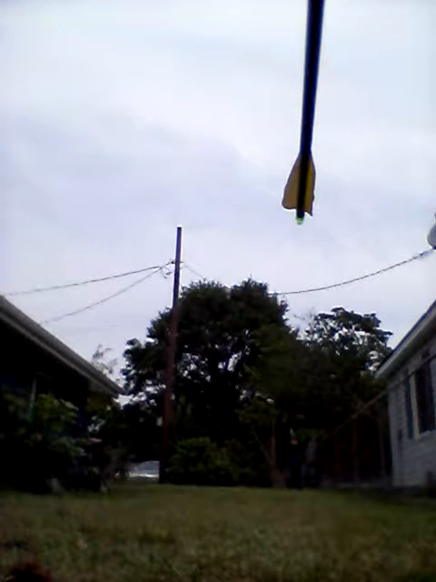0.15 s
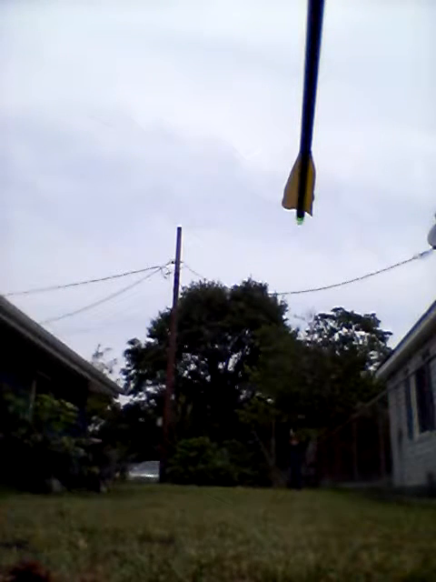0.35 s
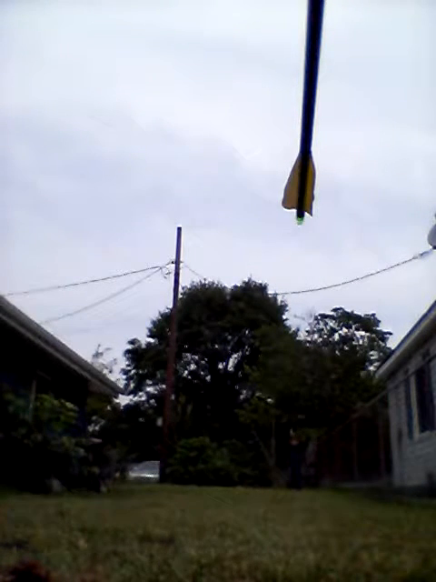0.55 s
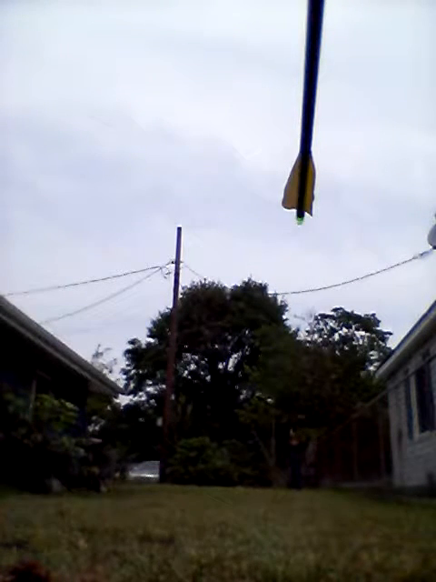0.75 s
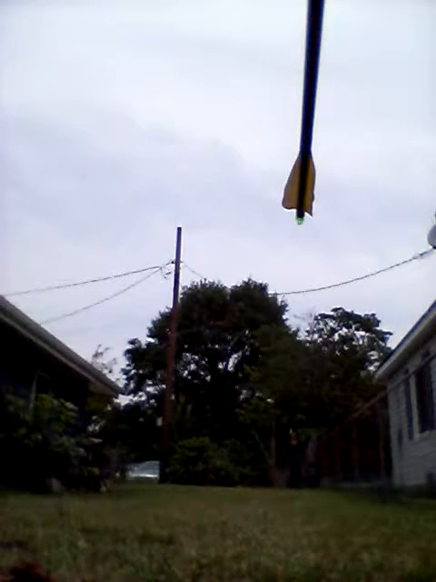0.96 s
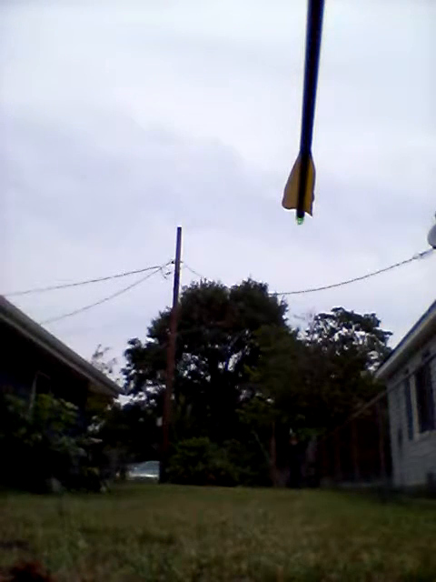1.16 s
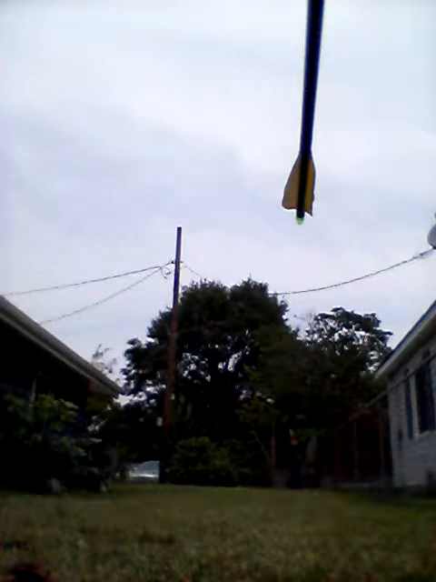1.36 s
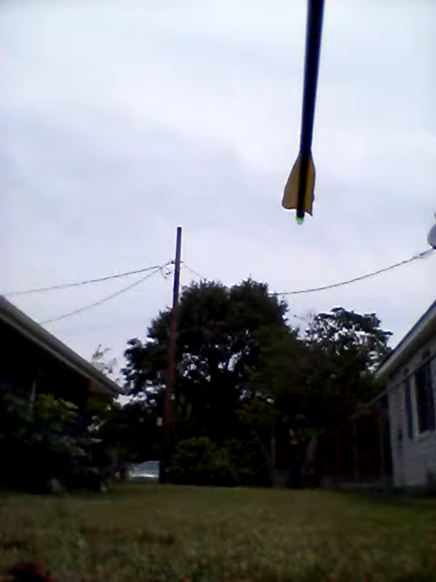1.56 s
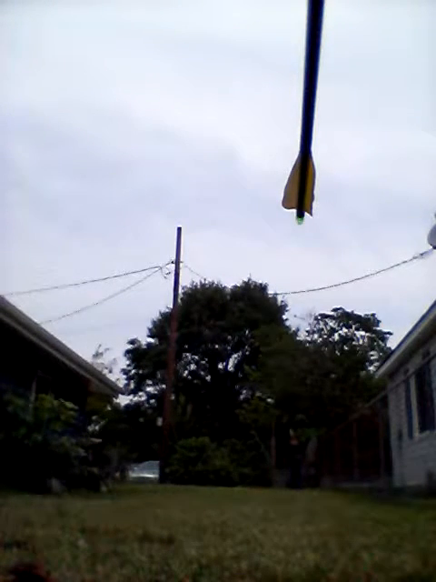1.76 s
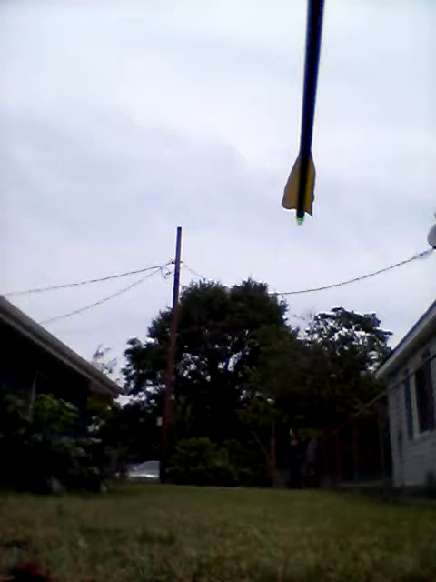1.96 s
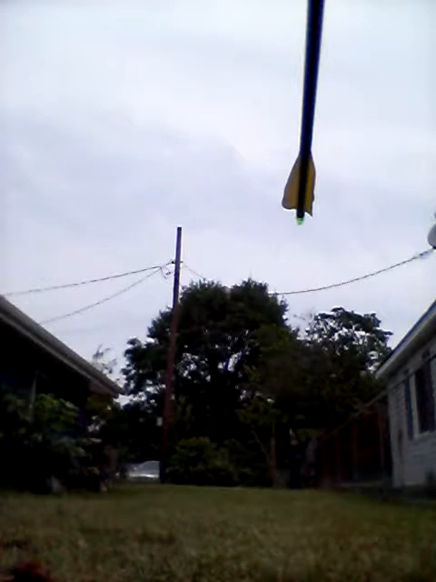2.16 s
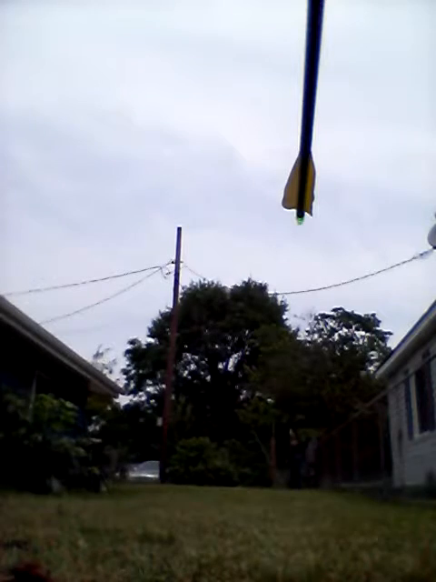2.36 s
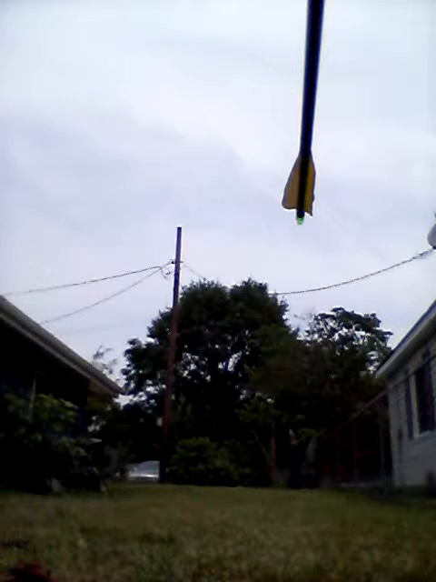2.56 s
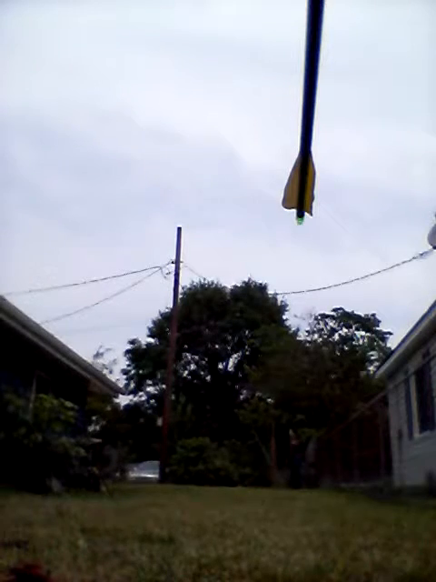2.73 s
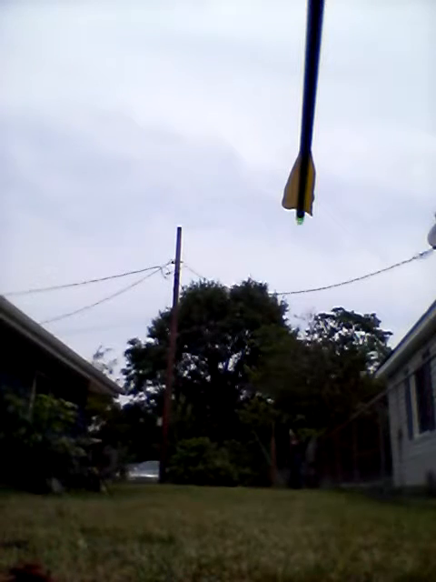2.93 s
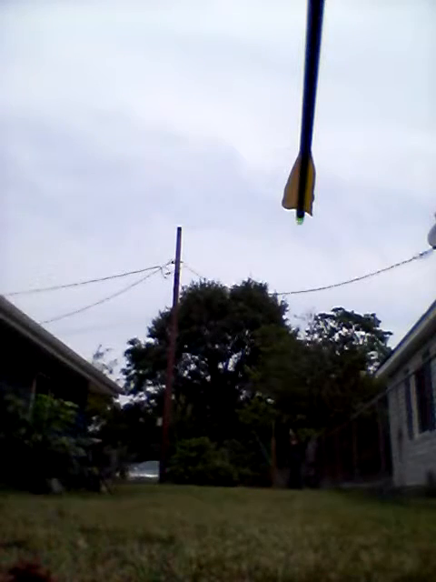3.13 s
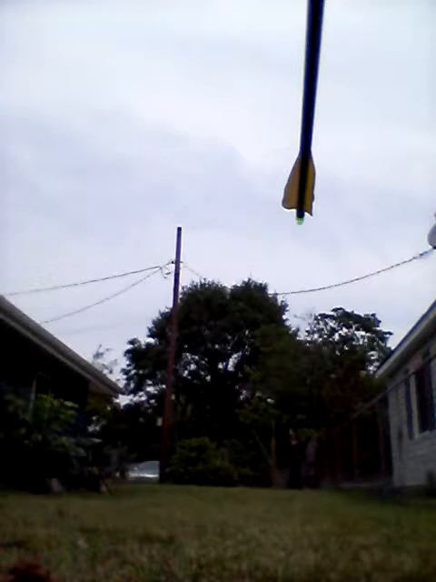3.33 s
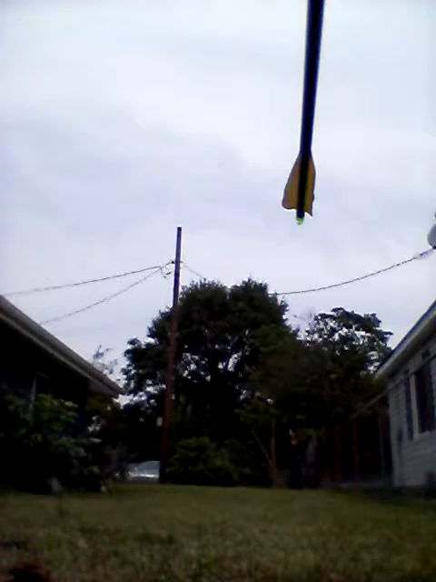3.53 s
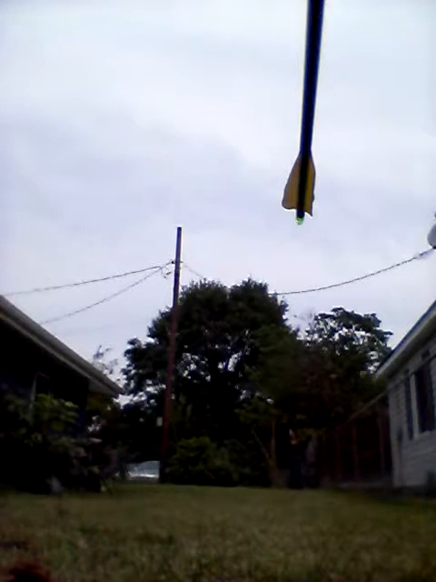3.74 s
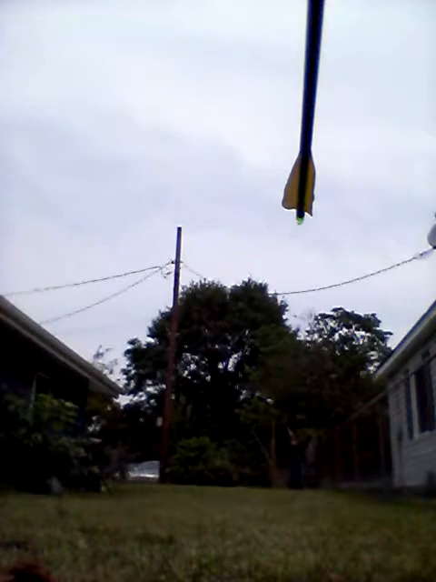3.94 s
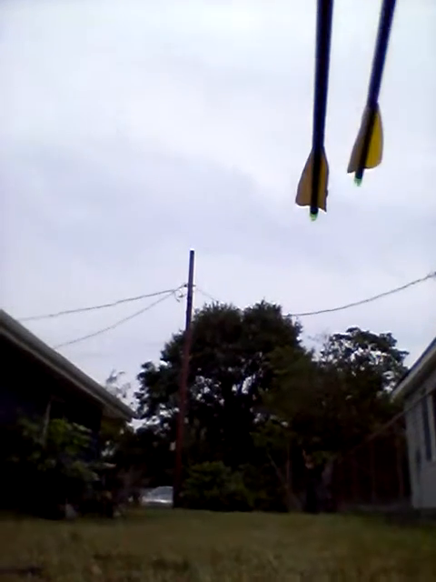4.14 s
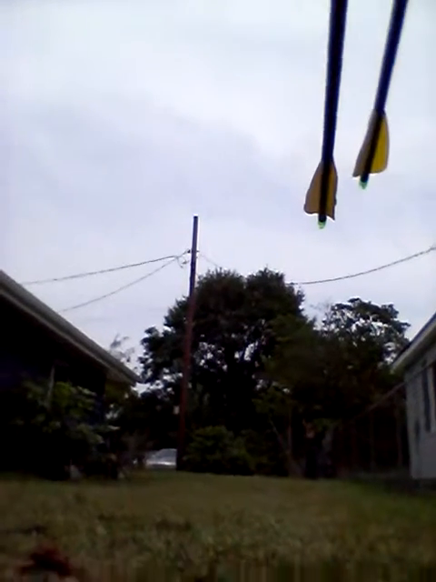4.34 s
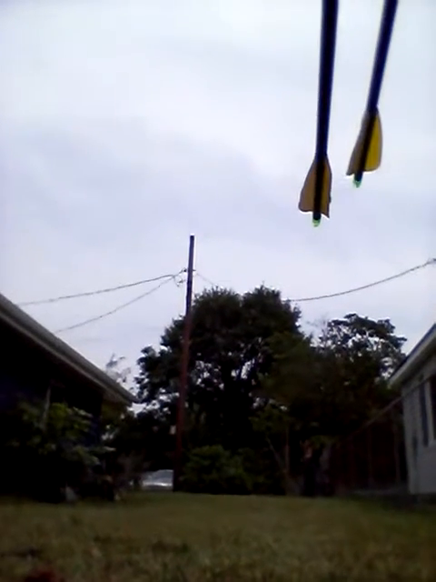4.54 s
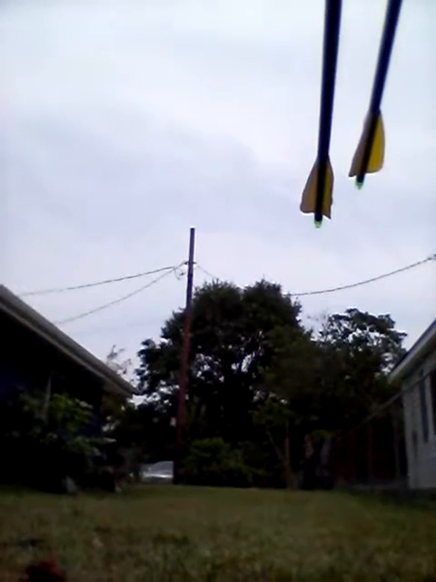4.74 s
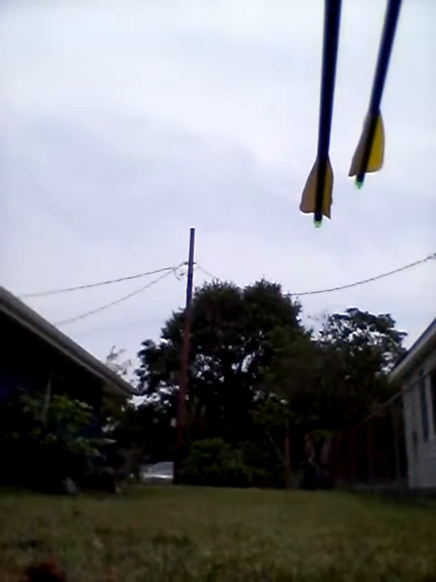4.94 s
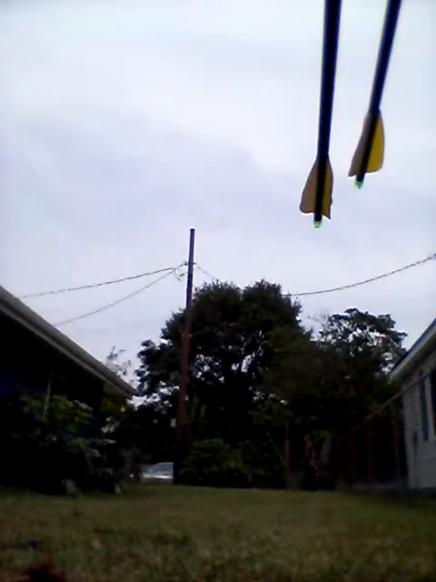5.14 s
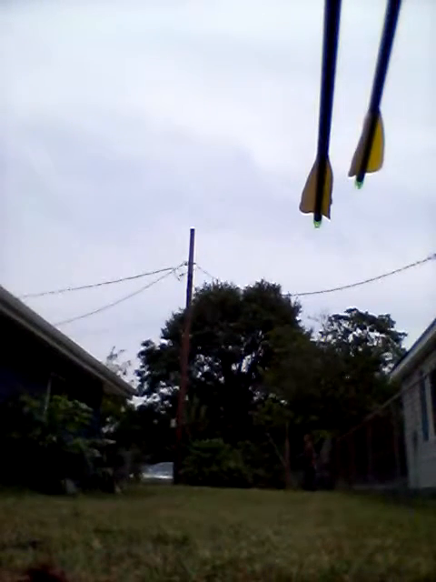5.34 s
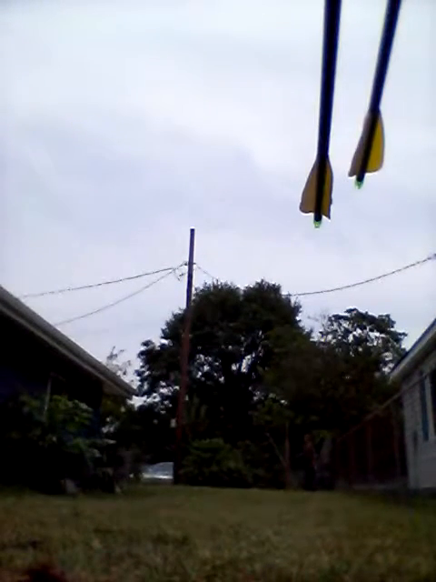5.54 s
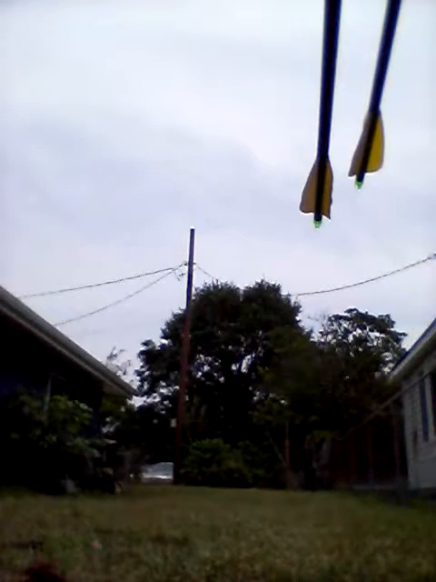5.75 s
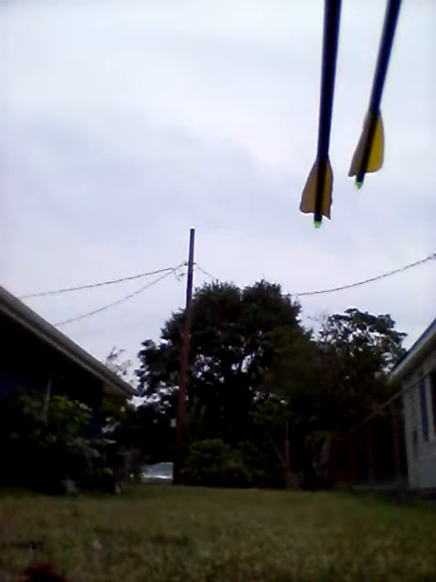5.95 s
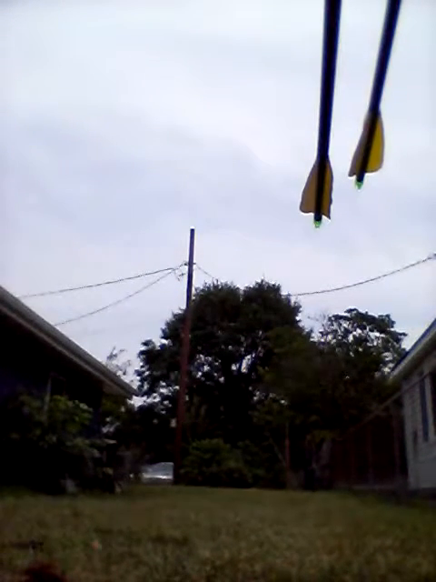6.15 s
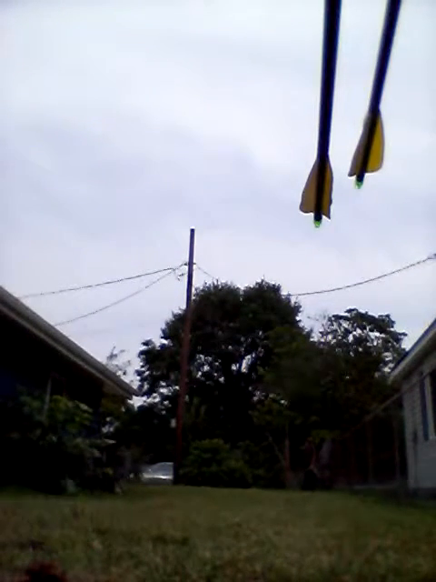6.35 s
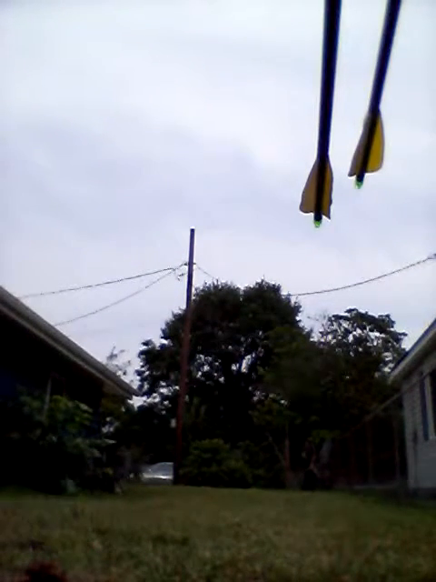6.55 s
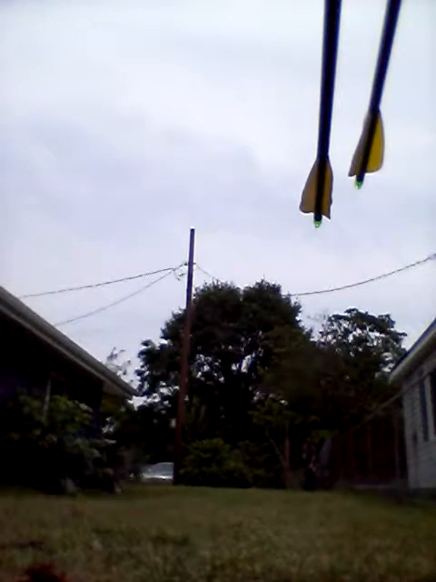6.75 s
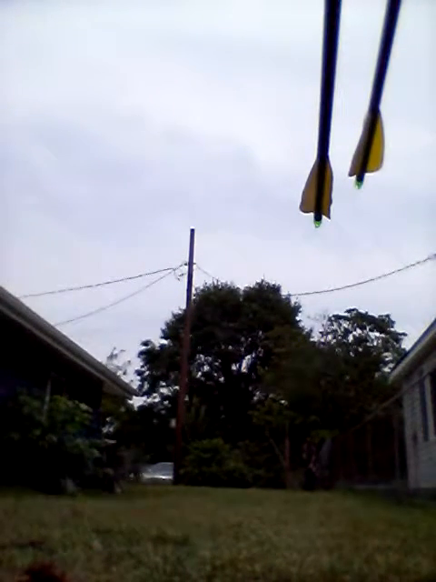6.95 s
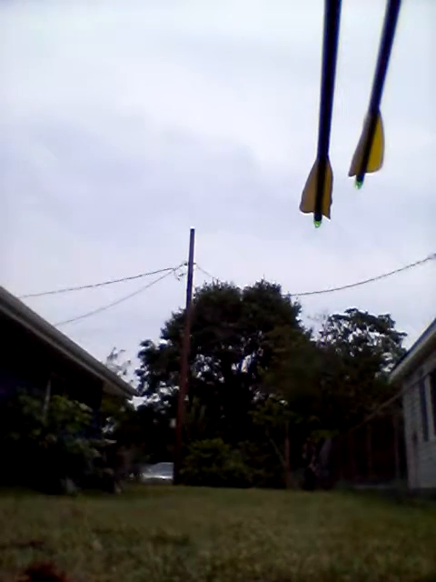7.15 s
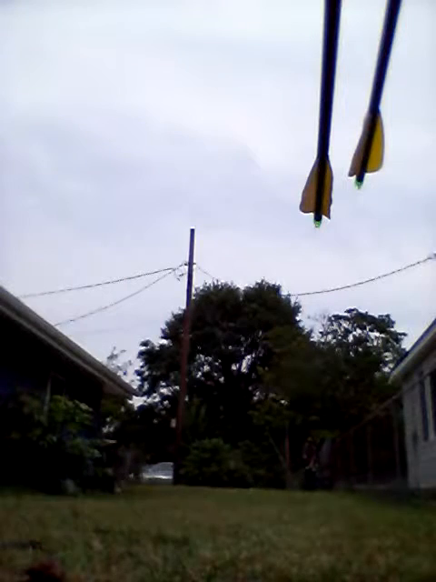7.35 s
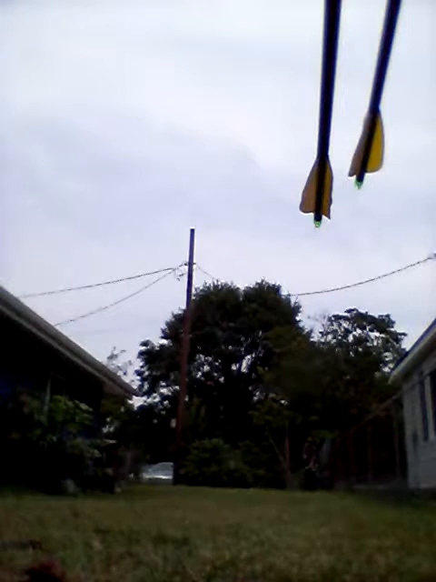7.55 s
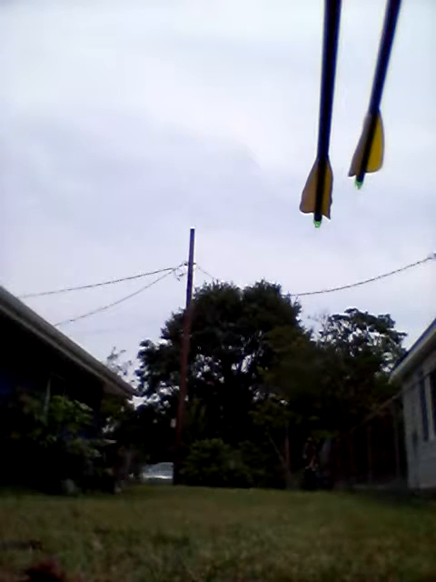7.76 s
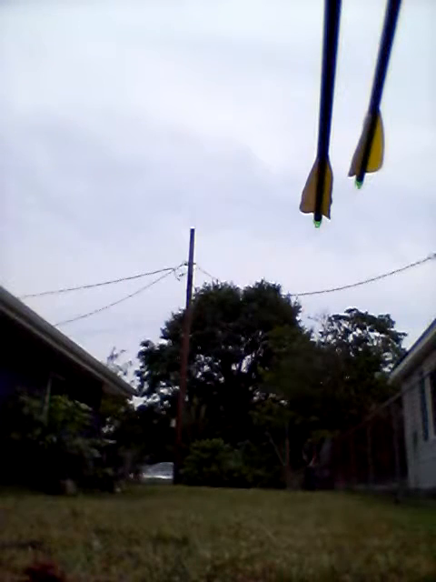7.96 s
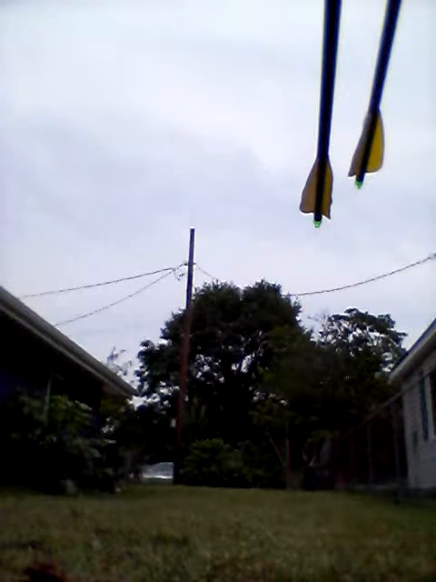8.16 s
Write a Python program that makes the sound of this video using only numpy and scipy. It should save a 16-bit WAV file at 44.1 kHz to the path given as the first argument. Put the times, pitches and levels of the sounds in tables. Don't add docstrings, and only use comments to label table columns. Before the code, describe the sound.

A quiet backyard between houses, with low distant traffic rumble and a faint compressor hum. A sparrow gives short, hoarse, falling two-note chirps that echo off walls, with fainter birds beyond. Near the middle a far bowstring slaps, vanes hiss in, and an arrow hits foam right beside the microphone with a huge sharp thwack. The shaft rattles briefly, wall slaps follow, and the chirps carry on.

```python
import sys
import numpy as np
from scipy import signal
from scipy.fft import rfft, irfft, next_fast_len
from scipy.io import wavfile
from scipy.ndimage import map_coordinates

SR = 44100
rng = np.random.default_rng(int(sys.argv[2]) if len(sys.argv) > 2 else 0)


def nominal_scale(level):
    x = np.asarray(level, float) / 20
    return 10 ** x


def int16_out(signal):
    q = np.round(np.clip(np.atleast_2d(signal).T, -1, 1) * 32767)
    wavfile.write(sys.argv[1], SR, q.astype(np.int16))


N = 365677


def unit(x):
    return x / np.sqrt(np.mean(x ** 2) + 1e-20)


def along(points, hz):
    f, value = np.transpose(points)
    return np.interp(np.log(hz + 1), np.log(f + 1), value)


def wobble(rate, size=N):
    knots = rng.standard_normal(int(size / SR * 1000) + 4)
    return map_coordinates(knots, [np.arange(size) * rate / SR])


def noise(gain, size=N):
    m = next_fast_len(size + 8192)
    spectrum = rfft(rng.standard_normal(m)) * gain(np.fft.rfftfreq(m, 1 / SR))
    return unit(irfft(spectrum, m)[:size])


def coloured(points, size=N):
    return noise(lambda hz: nominal_scale(along(points, hz)), size)


def resonant(peaks, size=N):
    def response(f):
        total = 0
        for k, (centre, width, db) in enumerate(peaks):
            damping = 1j * f * width
            total = total + (-1) ** k * nominal_scale(db) * damping / (centre ** 2 - f ** 2 + damping)
        return total
    return noise(response, size)


def burst(points, t60, attack):
    t = np.arange(SR // 2) / SR
    return nominal_scale(-60 * t / t60) * (1 - np.exp(-t / attack)) * coloured(points, size=len(t))


def ring(modes, scatter_db):
    t = np.arange(SR // 2) / SR
    total = np.zeros(len(t))
    for hz, db, t60 in modes:
        strength_db = db + scatter_db * rng.standard_normal()
        total += nominal_scale(strength_db - 60 * t / t60) * np.sin(2 * np.pi * hz * t)
    return total


def add(track, s, x):
    part = track[round(s * SR):][:len(x)]
    part += x[:len(part)]


# (time [s], body level [dB], crack level [dB], bass lost [dB per octave])
BLOWS = [
    (4.0836, 5, -9.5, 10.5),
    (4.0854, -8, -15.5, -4.5),
    (4.0893, 0.5, -14, 6.5),
    (4.095, -14, -17.5, -2),
    (4.1012, -18.5, -22, -1),
]
# (frequency [Hz], level [dB], t60 [s])
FOAM = [(120, -18.5, 0.085), (206, -5.5, 0.075), (261.5, -6, 0.086), (334, -4.5, 0.038),
        (480.6, -6.5, 0.04), (698, -12.5, 0.027), (892, -1.5, 0.024), (1010.4, -3, 0.03), (1200, -3, 0.01),
        (1385, -3, 0.017), (1905, -17.5, 0.022), (2354, -13.5, 0.028), (3420, -15.5, .05), (3587, -15, .07)]
# (frequency [Hz], level [dB per Hz])
THUD = [(40, -39.5), (80, -11), (200, -8.5), (330, 1), (500, -3.5), (900, -3.5), (1400, -11.5), (2200, -31),
        (4000, -120)]
# (frequency [Hz], level [dB per Hz])
CRACK = [(880, -28.5), (1500, -3), (1990, -11), (2640, -2.5), (3010, -5), (3710, -1.5), (4190, -10.5),
         (6530, -5.5), (8930, -16.5), (12300, -19), (15200, -24), (16700, -36.5)]


def thwack():
    sharp_hz = 960

    def starved(table, lost_db):
        rows = []
        for hz, db, *rest in table:
            octaves_below = max(np.log2(sharp_hz / hz), 0)
            rows.append((hz, db - lost_db * octaves_below, *rest))
        return rows

    out = np.zeros(N)
    for s, body_db, crack_db, lost_db in BLOWS:
        add(out, s, nominal_scale(body_db - 11.0) * ring(starved(FOAM, lost_db), scatter_db=1.9))
        add(out, s, nominal_scale(body_db - 16.5) * burst(starved(THUD, lost_db), 0.05, attack=0.00011))
        add(out, s, nominal_scale(crack_db) * burst(CRACK, 0.02485, attack=0.00018))
    return out


# (frequency [Hz], width [Hz], level [dB])
SHAFT = [(1950, 310, -9), (3050, 300, 2), (4200, 900, 0.5), (5000, 800, 3), (6416, 800, 0),
         (7740, 1400, -9), (11440, 4000, -19)]
# (frequency [Hz], level [dB per Hz])
SHUDDER = [(35, -43), (60, -11), (188, 0.5), (461, -12), (526, -15.5), (817, -18), (906, -7.5),
           (1180, -28.5), (2000, -24), (2600, -54), (4400, -120)]
# (time of peak [s], rattle level [dB], shudder level [dB])
SWINGS = [(4.107, -34.5, -29), (4.14, -38, -28), (4.162, -33.5, -29), (4.21, -51, -42), (4.3, -49, -43),
          (4.348, -58, -39), (4.378, -55, -43), (4.533, -61, -42), (4.64, -67.5, -65), (4.699, -66, -55)]
NOCK = [4.12, 4.134, 4.147, 4.158, 4.195, 4.224, 4.24, 4.273]
# (frequency [Hz], level [dB per Hz])
SNAP = [(710, -45), (1200, -21), (1730, -28.5), (2040, -7.5), (2710, -3), (2980, -7), (4080, -1.5),
        (4860, -13), (6100, 0.5), (9010, -15), (15700, -18), (15900, -59.5)]


def quiver():
    loosed_s, lands_s, chatter_ends_s = 3.95, 4.083, 4.53
    pass_s = 0.0089
    build_db_per_s, drop_db_per_s = 120, 700
    out, size = np.zeros(N), SR * 3 // 2
    t = loosed_s + np.arange(size) / SR
    since_blow = t - lands_s
    flight = nominal_scale(-45.5) * pass_s / (pass_s + np.abs(since_blow)) * (t < lands_s)

    def swing_db(s):
        return np.where(t < s, build_db_per_s * (t - s), drop_db_per_s * (s - t))

    steady_db = -36.5 - 62.5 * since_blow + np.minimum(drop_db_per_s * (chatter_ends_s - t), 0)
    rattle_db = np.max([steady_db] + [db + swing_db(s) for s, db, _ in SWINGS], axis=0)
    shudder_db = np.max([db + swing_db(s) for s, _, db in SWINGS], axis=0)
    roughness = nominal_scale(1.6 * wobble(90, size) + 2.2 * wobble(500, size))
    chatter = unit(roughness * resonant(SHAFT, size))
    trees = [(3000, -20), (6000, 0), (10000, -4.5), (15700, -8.5), (15900, -60)]
    wash = nominal_scale(-60 - 21.5 * since_blow) * coloured(trees, size)
    wag = nominal_scale(rattle_db + 0.5) * chatter + nominal_scale(shudder_db - 7.0) * coloured(SHUDDER, size) + wash
    add(out, loosed_s, flight * coloured(SNAP, size) + (t > SWINGS[0][0]) * wag)
    nock_band = [(7800, -39.5), (8400, -5.5), (8700, 1), (9300, -39)]
    for s in NOCK:
        tick_db = -44.5 - 93.5 * (s - NOCK[0])
        add(out, s, nominal_scale(tick_db) * burst(nock_band, 0.091, attack=.0005))
    return out


# (frequency [Hz], t60 [s])
YARD = [(100, .25), (1000, 0.9), (4000, 0.57), (12000, 0.48)]


def yard(x, delay):
    hz, t, z = signal.stft(rng.standard_normal(SR * 3 // 5), SR, nperseg=256)
    decay = nominal_scale(-60 * t / along(YARD, hz)[:, None])
    tail = signal.istft(z * decay, SR, nperseg=256)[1]
    delayed = np.pad(x, (round(delay * SR), 0))
    return signal.fftconvolve(delayed, tail / np.linalg.norm(tail))


# (time [s], peak level [dB], knock level [dB], t60 [s])
SLAPS = [
    (1.8974, -67, -8, 0.025),
    (4.3126, -26, -11, 0.039),
    (4.4576, -47, -14, 0.033),
    (4.5294, -61, -6, 0.03),
    (4.6837, -51.5, 13, 0.03),
    (7.4257, -60, -8, 0.032),
]
# (frequency [Hz], level [dB], t60 [s])
SLAP = [(260, -10.5, 0.054), (880, -5, .04), (1036, -22, .04), (1813, -5, .04)]
# (frequency [Hz], level [dB per Hz])
TICK = [(350, -35), (600, -7), (1190, -16), (1390, -23), (1850, -3), (2470, -20), (4580, -6), (5630, -13),
        (7400, -16), (8500, -35), (16000, -50.5)]


def slaps():
    out = np.zeros(N)
    for s, db, knock_db, t60 in SLAPS:
        add(out, s, nominal_scale(db + knock_db - 5.5) * ring(SLAP, scatter_db=3.5))
        add(out, s, nominal_scale(db - 6) * burst(TICK, t60, attack=0.000082))
    return out


# (time [s], snap level [dB], thrum level [dB], t60 [s])
STRING = [
    (3.856, -61, 5, 0.13),
    (3.871, -37, -7, 0.044),
    (3.877, -41, 6.5, 0.19),
    (3.912, -47, 1.5, 0.12),
    (3.966, -56.5, -0.5, 0.064),
]
# (frequency [Hz], level [dB], t60 [s])
BOW = [(235, 2, 0.11), (283.8, -4.5, 0.1), (452, -5, .07), (612, -8, 0.074), (745, -9, 0.079),
       (840, -22.5, 0.071)]


def bow():
    out = np.zeros(N)
    for s, snap_db, thrum_db, t60 in STRING:
        add(out, s, nominal_scale(snap_db + thrum_db) * ring(BOW, scatter_db=5.5))
        add(out, s, nominal_scale(snap_db) * burst(SNAP, t60, attack=0.00083))
    add(out, STRING[1][0], nominal_scale(-50) * burst(SNAP, .33, attack=.01))
    return out


def arch(length, start_hz, top_hz, end_hz, crest):
    u = np.linspace(0, 1, round(length * SR))
    rise = (start_hz - top_hz) * (1 - u / crest) ** 2
    fall = (end_hz - top_hz) * np.sin(np.pi / 2 * (u - crest) / (1 - crest)) ** 2
    return top_hz + np.where(u < crest, rise, fall), np.sin(np.pi * u) ** .5


def among_walls(x, echo_db, scatter_db, wet_db):
    t = np.arange(round(.09 * SR)) / SR
    scatter = nominal_scale(scatter_db) * rng.standard_normal(len(t)) / np.sqrt(0.016 * SR)
    walls = scatter * nominal_scale(-60 * t / 0.11) * (t > .004)
    walls[0] = 1
    for delay, rib_db in [(.0165, -1), (.0183, -19), (.0214, -5.5)]:
        walls[round(delay * SR)] = nominal_scale(echo_db + rib_db)
    heard = nominal_scale(wet_db) * yard(x, delay=.03)
    add(heard, 0, signal.fftconvolve(x, walls))
    return heard


# (time [s], level [dB], pitch factor [1], overtone level [dB], strong wall echo [dB])
SPARROW = [(0.964, -59, .92, -3, 5), (1.268, -58.5, 0.89, -27, -1), (1.625, -58, 0.92, -25, -5),
           (2.139, -59.5, 0.89, -23.5, 2), (3.052, -55.5, 0.95, -28, -4), (3.678, -55.5, 0.95, -8, 5.5),
           (4.377, -53.5, 0.97, -24, -12), (4.832, -54.5, 0.95, -11, 1.5), (5.268, -58.5, 0.96, 2, 9.5),
           (5.826, -65.5, 1.02, -5, 11.5), (6.304, -60, 1.01, -6, 3.5), (6.875, -62.5, 1.01, -7, 3),
           (7.454, -57.5, 0.99, -20, 6), (7.888, -58.5, 0.96, -20, 1.5)]
# (delay [s], length [s], start pitch [Hz], top pitch [Hz], end pitch [Hz])
NOTES = [
    (0, .036, 4100, 4730, 3653),
    (0.041, .052, 3050, 3621, 2757),
]
# (frequency [Hz], level [dB])
THROAT = [(2500, -7), (2750, -6), (3050, -0.5), (3350, -6), (3650, -2.5), (4050, 3.5), (4400, -2.5),
          (4750, -3), (5100, -13.5)]


def sparrow():
    hiss_band = [(5000, -30), (6500, 3), (15700, -9), (15900, -60)]
    out = np.zeros(N)
    for s, level_db, pitch, overtone_db, echo_db in SPARROW:
        add(out, s + .02, nominal_scale(level_db + overtone_db - 15) * burst(hiss_band, .45, attack=.004))
        lead_db = 130 * (pitch - 0.95) / 2
        note_levels = (level_db + lead_db, level_db - lead_db)
        veils = (-6, 0)
        for (after, length, *path_hz), db, veil_db in zip(NOTES, note_levels, veils):
            hz, swell = arch(length, *path_hz, crest=.22)
            hz = pitch * hz
            phase = 2 * np.pi * np.cumsum(hz + 105 * wobble(300, len(hz))) / SR
            voiced = swell * nominal_scale(along(THROAT, hz) + 0.63 * wobble(81, len(hz)))
            whistle = among_walls(voiced * np.sin(phase), echo_db, scatter_db=8.5, wet_db=-2.5 + echo_db / 3)
            add(out, s + after, nominal_scale(db - 0.5) * whistle)
            beak = np.exp(-((2 * hz - 7150) / 550) ** 2)
            overtone = swell * beak * np.sin(2 * phase)
            add(out, s + after, nominal_scale(level_db + overtone_db + veil_db) * overtone)
    return out


# (time [s], length [s], top pitch [Hz], end pitch [Hz], level [dB])
OTHERS = [(0, 0.1, 5760, 5720, -60), (0, .15, 5350, 5230, -62), (0.513, .06, 2770, 2590, -65.5),
          (0.612, 0.047, 2230, 2110, -72), (1.208, 0.045, 5460, 5000, -74), (3.352, 0.036, 2220, 2120, -73),
          (6.745, 0.0392, 4500, 4200, -82), (6.8, 0.038, 4520, 3910, -80.5),
          (1.535, 0.076, 1620, 1530, -74)]


def far_birds():
    out = np.zeros(N)
    for s, length, top_hz, end_hz, db in OTHERS:
        hz, swell = arch(length, top_hz, top_hz, end_hz, crest=.3)
        hoarse_hz = hz + 75.4 * wobble(263, len(hz))
        tone = swell * np.sin(2 * np.pi * np.cumsum(hoarse_hz) / SR)
        add(out, s, nominal_scale(db + 5.0) * among_walls(tone, echo_db=-13, scatter_db=4.5, wet_db=-3.0))
    return out


# (time [s], level [dB])
TOWN = [(0, -54), (.6, -53), (1.64, -54), (2.05, -53), (3.0, -53.5), (3.7, -54), (4.8, -56), (5.9, -58),
        (6.8, -56), (7.4, -57), (7.9, -57.5), (8.29, -56.5)]
# (frequency [Hz], level [dB per Hz])
RUMBLE = [(15, -56), (25, -26), (43, -7), (85, -11.5), (112, -2.5), (146, -16.5), (185, -1), (260, -6.5),
          (294, -0.5), (389, -8.5), (466, -11.5), (515, -6.5), (1150, -19), (1370, -28.5), (3000, -31),
          (3900, -68.5), (6600, -120)]
# (frequency [Hz], level [dB per Hz])
HISS = [(900, -31), (1500, -2), (2120, -0.5), (2900, -8.5), (3500, -7.5), (4000, -7), (5500, -6),
        (6100, -7), (6400, -6), (6800, -8.5), (9300, -13), (13000, -10), (15700, -10), (15850, -59.5)]
# (frequency [Hz], width [Hz], level [dB])
DRONE = [(122.4, 5.9, -62.5), (185.8, 7.5, -57.5), (241.3, 15, -58.5), (317, 20, -67), (374, 18, -63.5),
         (519.5, 7.8, -66.5)]
# (frequency [Hz], rms level [dB])
WHINE = [(53.8, -65.5), (118.2, -69), (188.4, -65.5), (527.6, -73.5), (1061, -84), (1120, -83.5),
         (1179, -75.5), (1297, -77)]


def town():
    t = np.arange(N) / SR
    rumble_db = np.interp(t, *np.transpose(TOWN))
    rumble = nominal_scale(0.9 * wobble(2.577) + 1.8 * wobble(16)) * coloured(RUMBLE)
    drone = sum(nominal_scale(db + 50.5) * resonant([(hz, width, 0)]) for hz, width, db in DRONE)
    whine = sum(nominal_scale(db - 1.3) * np.sin(2 * np.pi * hz * t + 0.42 * wobble(3.5)) for hz, db in WHINE)
    hiss_db = -69.5 + .3 * (rumble_db - rumble_db.mean()) + .6 * wobble(6)
    hiss = nominal_scale(hiss_db) * coloured(HISS)
    return nominal_scale(rumble_db) * (nominal_scale(-1.0) * rumble + drone) + whine + hiss


def scene():
    small_block = signal.butter(3, 95, "high", fs=SR, output="sos")
    hit = signal.sosfilt(small_block, thwack())
    answer = nominal_scale(-29) * yard(hit, delay=0.013)[:N]
    target = hit + answer + quiver() + slaps()
    return (target + bow() + sparrow() + far_birds() + town())[None]


def band_limit(x):
    return signal.sosfilt(signal.butter(12, 16820, fs=SR, output="sos"), x)


def record(dry):
    bass_cut = signal.butter(6, 46, "high", fs=SR, output="sos")
    x = signal.sosfilt(bass_cut, dry)
    x = x / (1 + np.abs(x / .99) ** 8) ** (1 / 8)
    return band_limit(x)


dry = scene()
out = record(dry)
int16_out(out)
```